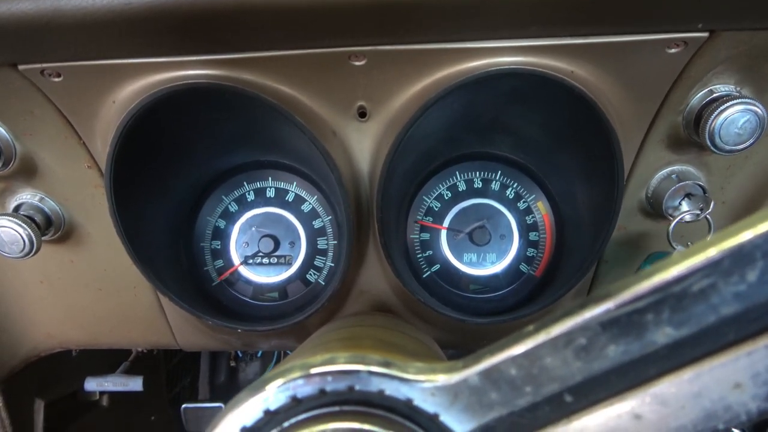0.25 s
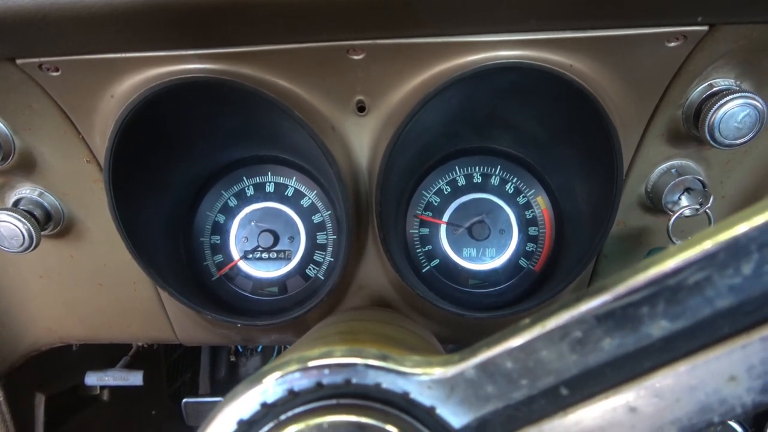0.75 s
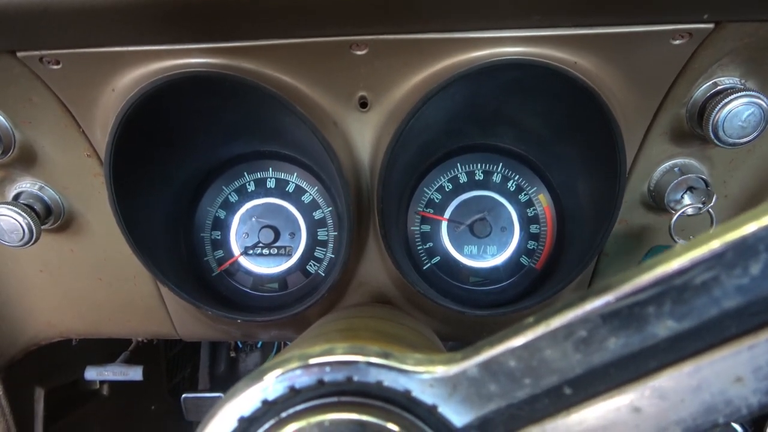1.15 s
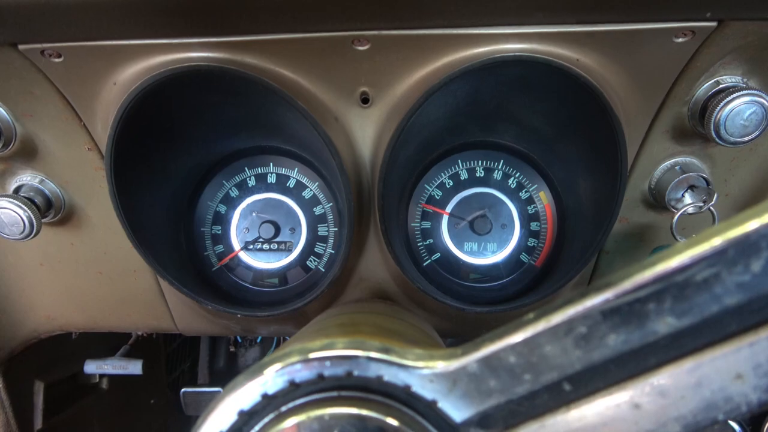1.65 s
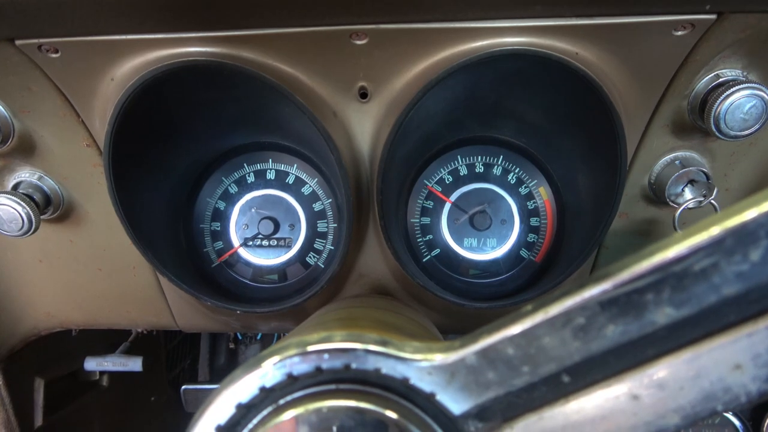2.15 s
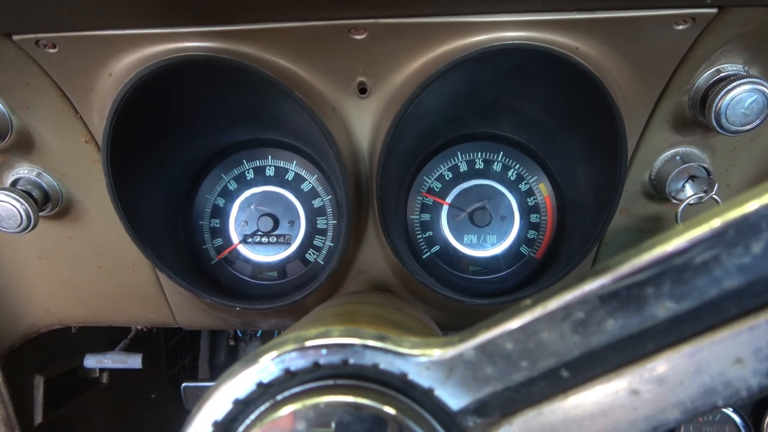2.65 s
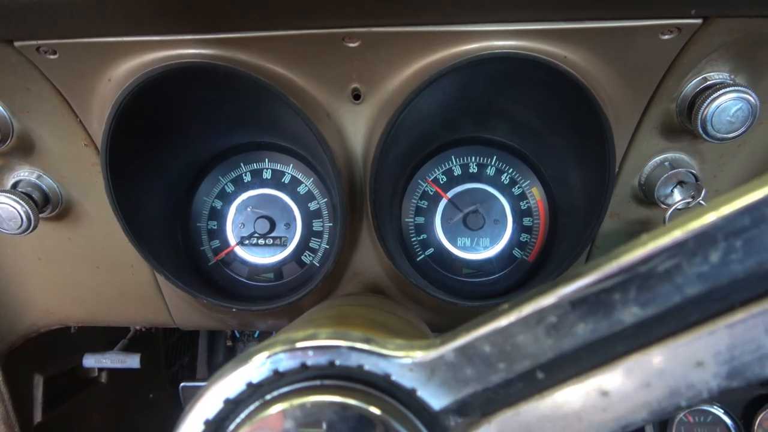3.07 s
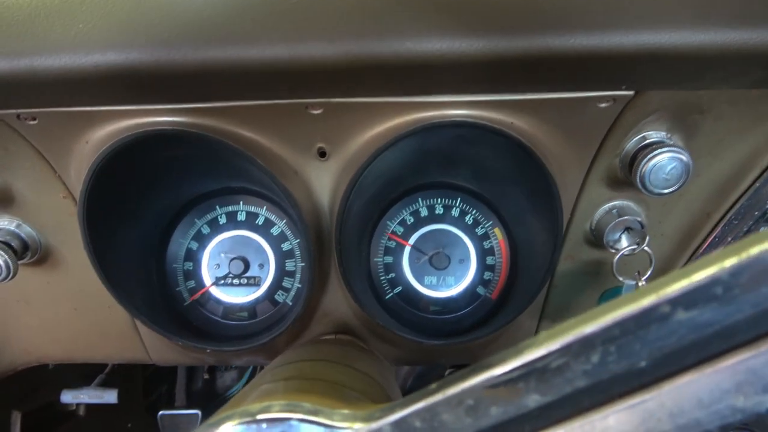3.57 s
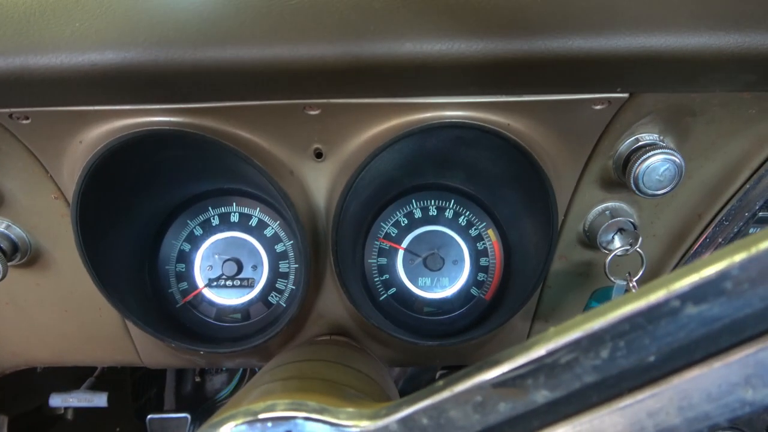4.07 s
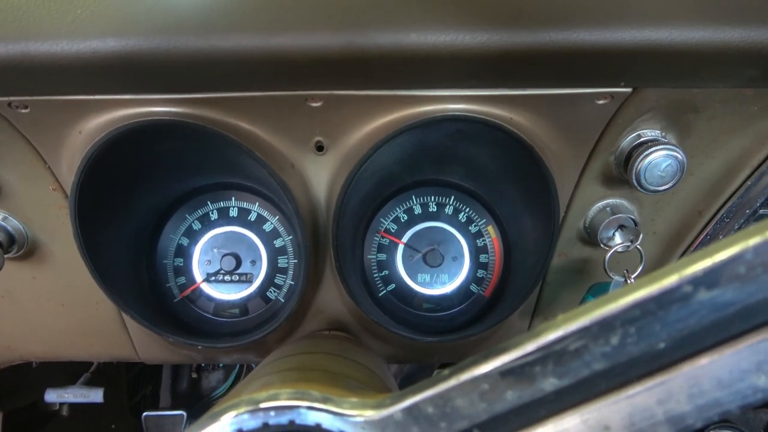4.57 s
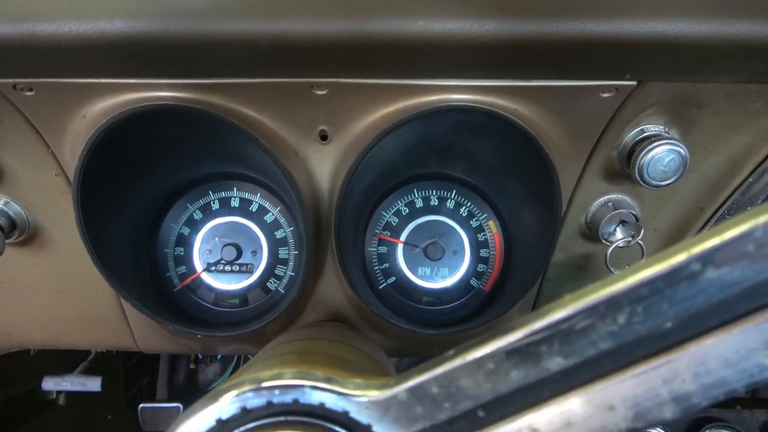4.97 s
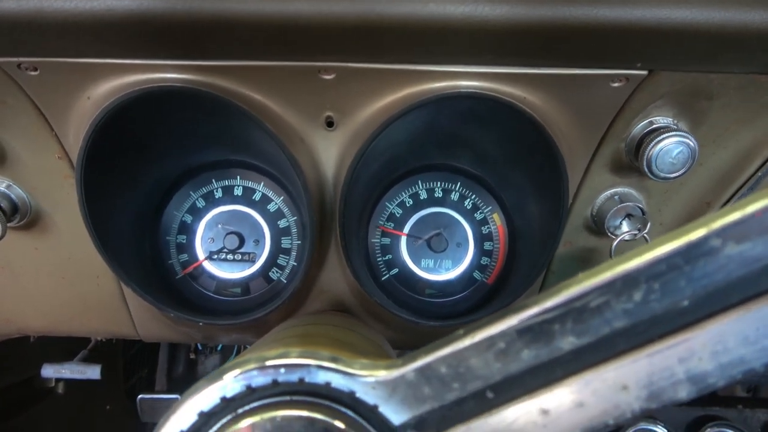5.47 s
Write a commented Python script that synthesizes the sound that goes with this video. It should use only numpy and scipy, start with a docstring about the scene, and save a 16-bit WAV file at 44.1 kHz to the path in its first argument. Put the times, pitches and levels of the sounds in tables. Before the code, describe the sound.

A loud V8 engine with a short exhaust is already running at a fast idle, heard from the driver's seat in a garage. Its deep, lumpy note booms in the cabin, with light valve ticking and faint jingling of keys and loose trim. At about 1.5 seconds the first rev rises, peaking near 2 seconds and falling back. A second, higher rev peaks at about 3 seconds, and a smaller third one at about 4.2 seconds. Each brings an exhaust roar, a soft hiss of intake air and a brief panel buzz, then an uneven, stumbling burble as the engine slows. Around 5 seconds the speed sags below idle, then picks up with a little throttle and a faint carburettor whistle until the end, near 5.7 seconds. A low body rumble and a soft whir of fan and belts continue throughout.

```python
"""A V8 with a short exhaust, at fast idle in a garage and blipped three times, heard from the driver's seat.
The firing note booms in the cabin; uneven firings burble through the pipes and throb in the mufflers.
Gas roars and hisses with the throttle, the carburettor gulps and whistles, and the valve gear ticks.
Behind it the fan and belts whir, the body shudders, keys and loose trim jingle, and a panel buzzes."""
import sys
import numpy as np
from scipy import signal
from scipy.fft import rfft, irfft
from scipy.io import wavfile
from scipy.ndimage import uniform_filter1d

SR = 44100
rng = np.random.default_rng(int(sys.argv[2]) if len(sys.argv) > 2 else 0)


def file_out(sig):
    """Save sig as 16-bit WAV at sys.argv[1]."""
    # one column per channel
    cols = np.atleast_2d(sig).T
    # limit, then scale
    lim = np.clip(cols, -1, 1)
    pcm = np.round(lim * 32767).astype(np.int16)
    wavfile.write(sys.argv[1], SR, pcm)


N = 252252
TIME_S = np.arange(N) / SR

# engine speed: (time [s], firing rate [Hz])
FIRING_RATE = [(0.0, 79.6), (0.8, 79.5), (1.39, 81.4), (1.59, 90.8), (1.95, 119.9), (2.2, 100.0),
               (2.45, 91.3), (2.7, 98.1), (2.95, 135.7), (3.26, 111.0), (3.7, 88.3), (3.84, 87.9),
               (4.24, 109.8), (4.5, 92.4), (5.1, 71.0), (5.17, 73.4), (5.72, 87.5)]
# in firing order: (strength [dB], lateness [firing gaps], tick [dB], boom [dB], throb [dB])
CYLINDER_BALANCE = [(2, .05, -12, 0, 0), (-0.8, -.16, -14, -.2, 0), (1.4, .08, -20, .8, 1),
                    (2.5, .09, -16, -1.6, 1.5), (-2, -.25, 0, -.9, 2), (-2.26, .12, -2.5, 1.3, -1.5),
                    (-1.9, .1, -18, -.6, -3.5), (0.9, -.04, -16, -1.5, -1.5)]
# accelerator, first press holds the fast idle: (start [s], down [s], release [s], opening [0-1])
PEDAL_PRESSES = [(-1, -.5, 1.9, .5), (1.15, 1.58, 1.9, .7), (2.37, 2.74, 2.9, 1), (3.8, 3.91, 4.17, .6),
                 (5.04, 5.32, 6, .68)]
# standing waves in pipes and body: (frequency [Hz], width [Hz], lift [dB])
STANDING_WAVES = [(160.2, 20, 4.8), (239.5, 11.4, 5), (267, 18, 5.5), (288, 12, 5), (307, 20, 3.5),
                  (350, 18, 2), (385, 24, 7.5), (463, 24, 7.5), (548, 24, 8), (600, 30, 6.5), (660, 26, 3),
                  (731, 26, 3), (887, 30, 3), (1165, 60, 3.8), (1270, 40, 2), (1570, 35, 3), (1695, 35, 3),
                  (1945, 30, 4), (2105, 35, 3.5), (2249, 18, 5.5)]


def amp(db):
    """Decibels to gain."""
    return 10 ** (np.asarray(db) / 20)


def unit(x):
    """Scale to rms 1."""
    return x / np.sqrt(np.mean(x ** 2) + 1e-20)


def wander(rate_hz):
    """Low-passed random drift, rms 1."""
    hz = np.fft.rfftfreq(N, 1 / SR)
    return unit(irfft(rfft(rng.standard_normal(N)) * np.exp(-(hz / rate_hz) ** 2), N))


def unit_in_band(x, lo_hz, hi_hz):
    """Scale to rms 1 within a band."""
    hz = np.fft.rfftfreq(N, 1 / SR)
    return x / irfft(rfft(x) * ((hz > lo_hz) & (hz < hi_hz)), N).std()


def colour(x, spectrum, modes=(), size=16384):
    """Minimum-phase filter from a spectrum and resonances: rings after a pulse, never before."""
    hz = abs(np.fft.fftfreq(size, 1 / SR))
    point_hz, point_db = np.transpose(spectrum)
    db = np.interp(np.log(hz + 1), np.log(point_hz), point_db)
    db += sum(lift / (1 + (2 * (hz - centre) / width) ** 2) for centre, width, lift in modes)
    response = np.exp(np.conj(signal.hilbert(np.log(amp(db)))))
    ring = np.fft.ifft(response).real[:size // 2]
    return signal.fftconvolve(x, ring)[:N]


def garage(x, t60_s, wet_db):
    """Direct sound plus dense reflections from near walls."""
    t = TIME_S[:SR // 2]
    tail = rng.choice([-1., 1.], len(t)) * (rng.random(len(t)) < .1) * amp(-60 * t / t60_s)
    return x + amp(wet_db) * signal.fftconvolve(x, tail / np.linalg.norm(tail))[:N]


def train(at, sizes):
    """Impulses at the given samples."""
    return np.bincount(at, sizes, N)


def puffs(pulses, decay_s, steady):
    """Turbulence flaring at each pulse over a steady flow."""
    flare = signal.lfilter([1], [1, -np.exp(-1 / (decay_s * SR))], pulses)
    return unit((steady + unit(flare)) * rng.standard_normal(N))


def hold(start_s, end_s, attack_s, release_s):
    """Envelope: linear rise, hold, exponential decay."""
    rise = np.clip((TIME_S - start_s) / attack_s, 0, 1)
    return rise * np.exp(-np.maximum(TIME_S - end_s, 0) / release_s)


def gate(spans, attack_s, release_s):
    """Summed gain of held spans."""
    return sum(amp(db) * hold(start_s, end_s, attack_s, release_s) for start_s, end_s, db in spans)


def firing_hz():
    """Firing rate at every sample."""
    return np.interp(TIME_S, *np.transpose(FIRING_RATE))


def throttle():
    """Opening 0-1; the gas flow dies away after each release."""
    return np.max([opening * hold(start_s, end_s, down_s - start_s, release_s=.08)
                   for start_s, down_s, end_s, opening in PEDAL_PRESSES], axis=0)


def coasting(full_load_opening=.55):
    """0 under load, 1 with the throttle shut."""
    return 1 - np.clip(throttle() / full_load_opening, 0, 1)


def effort_db(throttle_db=0, octave_db=0, idle_hz=80):
    """Level change with throttle opening and per doubling of speed."""
    return throttle_db * throttle() + octave_db * np.log2(firing_hz() / idle_hz)


def lift_off(width_s):
    """Peak around each pedal release, scaled by the opening."""
    return np.max([opening * np.exp(-((TIME_S - end_s) / width_s) ** 2)
                   for _, _, end_s, opening in PEDAL_PRESSES], axis=0)


def overrun(decay_s):
    """Swell and fade after each pedal release."""
    ages = [(np.maximum(TIME_S - end_s, 0) / decay_s, opening) for _, _, end_s, opening in PEDAL_PRESSES]
    return sum(opening * age * np.exp(1 - age) for age, opening in ages)


def stumble_db():
    """Combustion stumbles and catches again."""
    # (time [s], half length [s], change [dB])
    stumbles = [(1.625, .014, -10), (1.99, .03, -9), (2.09, .014, 7), (2.2, .02, -4), (2.295, .03, 3),
                (2.37, .02, -5), (2.5, .015, -8), (3.27, .02, 4), (3.345, .012, 5), (3.39, .035, -5),
                (3.635, .02, -9), (3.775, .035, -15), (3.945, .015, -5), (4.275, .02, -12), (4.485, .02, 6),
                (4.54, .025, -14), (4.625, .028, -11), (4.82, .025, -5), (4.86, .012, 5), (4.955, .012, 5),
                (4.99, .025, -7), (5.06, .025, -10), (5.105, .015, 6), (5.21, .02, -8), (5.28, .012, 4),
                (5.32, .025, -7)]
    return sum(db * np.exp(-((TIME_S - time_s) / half_s) ** 2) for time_s, half_s, db in stumbles)


def lope_db(phase, column):
    """Per-cylinder level, interpolated as the crankshaft turns."""
    levels_db = np.array(CYLINDER_BALANCE)[:, column]
    return np.interp(phase, np.arange(len(levels_db)), levels_db, period=len(levels_db))


def firings(phase, scatter_db, overrun_db, jitter_gaps):
    """Sample, cylinder and strength of each firing; less even while the engine slows."""
    count = np.arange(1, int(phase[-1]))
    cylinder = count % len(CYLINDER_BALANCE)
    strength_db, late_gaps = np.array(CYLINDER_BALANCE)[cylinder, :2].T
    spread, slip = rng.standard_normal((len(count), 2)).T
    at = np.minimum(np.searchsorted(phase, count + late_gaps + jitter_gaps * slip), N - 1)
    slowing = np.clip(-np.gradient(firing_hz()) * SR / 20, 0, 1)[at]
    return at, cylinder, amp(strength_db + (scatter_db + overrun_db * slowing) * spread)


def whir(level_db, overrun_db):
    """Fan, belts and valve train: louder with speed, rasping on the overrun."""
    # (frequency [Hz], level [dB])
    spectrum = [(200, -20), (700, -2), (950, 7.5), (1400, 3), (1750, -1), (2050, 3), (2500, -1),
                (3400, 2.8), (4200, -1.5), (5200, -11), (7000, -20), (16000, -45)]
    db = level_db + effort_db(octave_db=5) + overrun_db * overrun(decay_s=.2)
    return amp(db) * unit(colour(rng.standard_normal(N), spectrum, STANDING_WAVES))


def bursts(times_s, levels_db, decay_s):
    """Envelope of rattles that flare and die away."""
    age = TIME_S[:SR // 4] / decay_s
    starts = train(np.round(times_s * SR).astype(int), amp(levels_db))
    return signal.fftconvolve(starts, np.sqrt(age) * np.exp(-age))[:N]


def contacts(spectrum, per_s, t60_s):
    """Tiny random knocks of metal on metal."""
    knocks = rng.standard_normal(N) * (rng.random(N) < per_s / SR)
    return unit(colour(garage(knocks, t60_s, wet_db=0), spectrum))


def rattles(jingle_db, ring_db, chatter_db, coast_db, clump_db):
    """Keys and trim shaken by the engine: short bursts over faint, clumpy chatter."""
    # (time [s], relative jingle [dB], relative ring [dB])
    shakes = [(0.048, -48, -56), (0.089, -54, -64), (0.152, -52, -62), (0.192, -53, -66),
              (0.259, -50.5, -62), (0.362, -55, -66), (0.46, -54, -58), (0.515, -51.5, -62),
              (0.556, -51, -54), (0.754, -49.5, -55), (0.885, -54, -66), (0.962, -53.5, -66),
              (1.06, -52, -60), (1.091, -50, -56), (1.158, -54, -66), (1.19, -55, -66), (1.358, -48, -45.5),
              (1.398, -51, -60), (1.443, -52, -58), (1.483, -52, -62), (1.541, -50, -62), (3.746, -55, -64),
              (4.083, -50, -58), (4.189, -53, -60), (4.398, -58, -70), (4.57, -61, -70), (4.651, -59, -70),
              (4.778, -58, -70), (4.852, -51.5, -57), (4.95, -61, -72), (5.056, -60, -70),
              (5.116, -56, -62), (5.163, -51, -55), (5.307, -50, -60), (5.369, -50, -60), (5.58, -52, -58),
              (5.692, -54, -64)]
    # small metal: (frequency [Hz], level [dB])
    key_spectrum = [(100, -60), (1500, -22), (3500, -9), (5500, 0), (7000, -.5), (8600, 0), (11000, -3),
                    (13000, -10), (16000, -19)]
    # ringing trim: (frequency [Hz], level [dB])
    trim_spectrum = [(100, -60), (1500, -24), (3500, -13), (4400, -14), (4750, 4), (5100, -2), (5500, 2),
                     (6000, -8), (6500, -2), (7200, -14), (16000, -40)]
    times_s, keys_db, trim_db = np.transpose(shakes)
    chatter = amp(chatter_db + coast_db * coasting() + clump_db * wander(16))
    key_gain = bursts(times_s, keys_db + jingle_db, decay_s=.016) + chatter
    trim_gain = bursts(times_s, trim_db + ring_db, decay_s=.018)
    keys = key_gain * contacts(key_spectrum, per_s=1600, t60_s=.15)
    return keys + trim_gain * contacts(trim_spectrum, per_s=2500, t60_s=.12)


def buzz(pulses, grit):
    """Under load each firing slaps a loose panel; the rasp rings in the cabin."""
    # (start [s], end [s], level [dB])
    spans = [(1.6, 1.65, -45.5), (1.7, 1.92, -52), (2.6, 2.98, -50.5), (2.74, 2.87, -53), (4.14, 4.17, -47)]
    # (frequency [Hz], level [dB])
    spectrum = [(300, -40), (900, -12), (1250, 2), (1550, -2), (1800, -6), (2300, -15), (3600, -15),
                (6000, -28), (16000, -60)]
    slaps = np.sqrt(pulses)
    rasp = unit(garage(slaps, t60_s=.08, wet_db=4)) + grit * puffs(slaps, decay_s=.003, steady=.3)
    return gate(spans, attack_s=.015, release_s=.025) * unit(colour(rasp, spectrum, STANDING_WAVES))


def ticks(at, cylinder, level_db, coast_db, scatter_db, mode_scatter_db, fade_db_per_s, fade_from_s):
    """Valve gear ticks per firing, loudest at idle and once a cycle; each stirs the modes differently."""
    # ringing metal: (frequency [Hz], width [Hz], level [dB])
    modes = [(3620, 240, -10), (4680, 180, -8), (4900, 170, -4.5), (5350, 200, 1), (5530, 200, -1.5),
             (5720, 150, -6), (9100, 5000, -19)]
    sizes = amp(np.array(CYLINDER_BALANCE)[cylinder, 2] + scatter_db * rng.standard_normal(len(at)))
    ring = np.zeros(N)
    for hz, width_hz, mode_db in modes:
        shares = amp(mode_scatter_db * rng.standard_normal(len(at)))
        taps = puffs(train(at, sizes * shares), decay_s=.013, steady=0)
        bandpass = signal.butter(2, [hz - width_hz / 2, hz + width_hz / 2], "band", fs=SR)
        ring += amp(mode_db) * signal.lfilter(*bandpass, taps)
    fade_db = fade_db_per_s * np.maximum(TIME_S - fade_from_s, 0)
    db = level_db - fade_db + coast_db * coasting() + effort_db(octave_db=-18)
    return amp(db) * unit(garage(ring, t60_s=.06, wet_db=1.5))


def whistle(waver_hz, flutter_db):
    """Air sings in narrow, wavering tones at the edges of the throttle plates."""
    # (start [s], end [s], level [dB])
    spans = [(1.55, 1.66, -61), (4.09, 4.23, -59.5), (5.23, 5.52, -58.5), (5.52, 5.68, -61.5)]
    # (frequency [Hz], level [dB])
    tones = [(3760, -6), (3940, -4), (5470, -3), (5610, 0), (5900, -6), (6540, -6)]
    sound = np.zeros(N)
    for hz, db in tones:
        gain = amp(db + flutter_db * wander(20))
        sound += gain * np.sin(2 * np.pi * np.cumsum(hz + waver_hz * wander(150)) / SR)
    return gate(spans, attack_s=.025, release_s=.02) * unit(sound)


def intake(flicker_db):
    """The carburettor gulps air: a bright rush that starts and stops with the throttle plates."""
    # (start [s], end [s], level [dB])
    gulps = [(1.54, 1.925, -55), (2.62, 2.93, -52.5), (2.73, 2.89, -54), (3.905, 3.98, -54.5),
             (4.02, 4.22, -59.5), (5.29, 5.48, -58), (5.52, 5.72, -63)]
    # (frequency [Hz], level [dB])
    spectrum = [(1000, -12), (2500, -11), (4400, -6), (5300, 2), (6500, 1), (7500, -3), (8800, -9),
                (11000, -10), (13500, -16), (16000, -24)]
    rush = unit(colour(rng.standard_normal(N), spectrum))
    return gate(gulps, attack_s=.032, release_s=.03) * amp(flicker_db * wander(80)) * rush


def hiss(pulses, level_db, flicker_db, surge_db):
    """Air pulses past the throttle and leaking joints, swelling as the throttle opens."""
    # (frequency [Hz], level [dB])
    spectrum = [(800, 4.5), (2500, -14.5), (3700, -4.5), (4500, -1), (5600, 0), (6500, -2.5), (7700, -6),
                (10500, -11), (13000, -17.5), (16000, -28)]
    air = colour(puffs(pulses, decay_s=.024, steady=3), spectrum)
    unsteady_db = flicker_db * wander(60) + surge_db * wander(6.1)
    db = level_db + effort_db(throttle_db=10.6, octave_db=5) + unsteady_db
    return amp(db) * unit_in_band(air, 4400, 14000)


def roar(pulses, level_db, crack, lift_db):
    """Each firing leaves the tailpipe as a sharp front and a puff of turbulence."""
    # (frequency [Hz], level [dB])
    spectrum = [(100, -25), (300, -3), (430, -4), (570, -.5), (790, -4), (1000, -1.5), (1300, 0),
                (1800, -9), (2600, -12.5), (3600, -12), (4400, -21), (6000, -40), (16000, -80)]
    fronts = np.sqrt(pulses)  # mufflers even out strong and weak firings
    gas = puffs(fronts, decay_s=.01, steady=1)
    gas += crack * unit(garage(fronts - fronts.mean(), t60_s=.36, wet_db=6.5))
    db = level_db + effort_db(throttle_db=6.8, octave_db=2) + lift_db * lift_off(width_s=.08)
    return amp(db) * unit_in_band(colour(gas, spectrum, STANDING_WAVES), 450, 2200)


def shudder(level_db):
    """The rocking engine keeps the body rumbling, louder with speed."""
    # (frequency [Hz], level [dB])
    spectrum = [(10, -25), (30, -13), (38, -8.5), (46, -1), (54, 7.5), (64, -4), (90, -10.5), (200, -47.5),
                (1000, -100)]
    return amp(level_db + effort_db(octave_db=2)) * unit(colour(rng.standard_normal(N), spectrum))


def throb(phase, pulses, level_db, lift_db, rough, sway_db):
    """Hollow mufflers ring with the firings and swell once a cycle: the lumpy V8 beat."""
    # (frequency [Hz], level [dB])
    spectrum = [(60, -45), (150, -18), (200, 0), (250, 0), (300, -1), (350, -6), (390, -15), (430, -23),
                (560, -19), (750, -23), (1200, -45), (5000, -100)]
    fronts = np.sqrt(pulses)
    drive = unit(fronts - fronts.mean()) + rough * puffs(fronts, decay_s=.008, steady=1)
    db = level_db + lope_db(phase, column=4) + lift_db * lift_off(width_s=.1)
    db += effort_db(throttle_db=1.5, octave_db=3) + sway_db * wander(12)
    return amp(db) * unit(colour(drive, spectrum, STANDING_WAVES))


def burble(phase, pulses, level_db, coast_db, lift_db, sway_db, stumble_share):
    """Unequal firings sound the other engine orders in the pipes, loudest at pedal release."""
    # pipes and cabin together: (frequency [Hz], level [dB])
    spectrum = [(10, -15), (32, -17.5), (52, -9.5), (64, -15.5), (80, 0), (102, 2.5), (130, -3.3),
                (160, -8), (205, -15.5), (275, -20.5), (350, -26), (430, -42), (560, -36), (1000, -58),
                (5000, -110)]
    spin = np.exp(2j * np.pi * phase)
    even = 2 * (spin * uniform_filter1d(pulses / spin, SR // 5)).real
    uneven = unit(pulses - even - pulses.mean())  # the even share is the boom
    rough = np.interp(firing_hz(), [82, 120], [.06, .15])
    drive = uneven + rough * puffs(pulses, decay_s=.004, steady=.98)
    db = level_db + coast_db * coasting() + lift_db * lift_off(width_s=.08)
    db += sway_db * wander(5) + stumble_share * stumble_db()
    return amp(db) * unit_in_band(colour(drive, spectrum, STANDING_WAVES), 135, 420)


def boom(phase, gain_db, coast_db, unsteady_db, flutter, second_db, third_db, tuned_hz, width_hz):
    """The firing note sweeps the cabin resonances: weak when coasting, lumpy with overtones near idle."""
    # (firing rate [Hz], level [dB])
    cabin_response = [(70, -24), (74.5, -29.5), (79, -22), (83, -17.5), (90, -18.5), (93, -24.5),
                      (97, -17.5), (103, -18.5), (109, -23), (116, -28), (126, -35), (135, -32)]
    rate_hz = firing_hz()
    spin = np.exp(2j * np.pi * phase)
    in_tune = 1 / (1 + ((rate_hz - tuned_hz) / width_hz) ** 2)
    note = spin + in_tune * (amp(second_db) * spin ** 2 + amp(third_db) * spin ** 3)
    db = gain_db + np.interp(rate_hz, *np.transpose(cabin_response)) + coast_db * coasting()
    db += in_tune * lope_db(phase, column=3) + stumble_db()
    db += np.maximum(in_tune, coasting()) * unsteady_db * wander(18)
    return amp(db) * np.sqrt(2) * note.real * (1 + flutter * wander(3))


def scene():
    """Mono mix of engine and car around one crankshaft and throttle."""
    phase = np.cumsum(firing_hz()) / SR  # one unit per firing
    at, cylinder, sizes = firings(phase, scatter_db=1.1, overrun_db=1.3, jitter_gaps=.018)
    pulses = train(at, sizes)
    lag_gaps = .37
    exhaust = boom(phase - lag_gaps, gain_db=.1, coast_db=-6.3, unsteady_db=.7, flutter=.04,
                   second_db=-17.5, third_db=-19, tuned_hz=79.6, width_hz=3.1)
    exhaust += burble(phase, pulses, level_db=-33.9, coast_db=-3.6, lift_db=4.3,
                      sway_db=.7, stumble_share=.2)
    exhaust += throb(phase, pulses, level_db=-42.3, lift_db=1.5, rough=2.2, sway_db=.7)
    body = shudder(level_db=-37.3)
    gas = roar(pulses, level_db=-52, crack=.7, lift_db=1.5)
    gas += hiss(pulses, level_db=-66.7, flicker_db=.94, surge_db=.8)
    carburettor = intake(flicker_db=1) + whistle(waver_hz=55, flutter_db=2.5)
    valves = ticks(at, cylinder, level_db=-60, coast_db=-16, scatter_db=1.5, mode_scatter_db=2.5,
                   fade_db_per_s=2.4, fade_from_s=1.6)
    trim = rattles(jingle_db=-5, ring_db=1, chatter_db=-70.5, coast_db=-5, clump_db=3.5)
    panel = buzz(pulses, grit=.8)
    fan = whir(level_db=-57.8, overrun_db=2)
    return (exhaust + body + gas + carburettor + valves + trim + panel + fan)[None]


def record(dry):
    """Steep low-pass at 15.7 kHz."""
    lowpass = signal.firwin(511, 15700, window=("kaiser", 9), fs=SR)
    return signal.oaconvolve(dry, lowpass[None], "same")


dry = scene()
out = record(dry)
file_out(out)
```